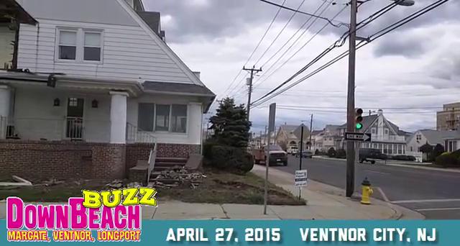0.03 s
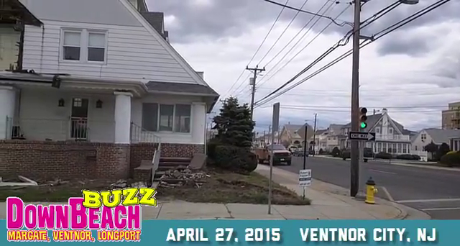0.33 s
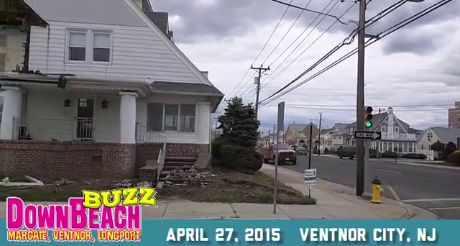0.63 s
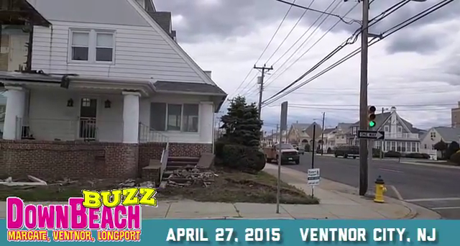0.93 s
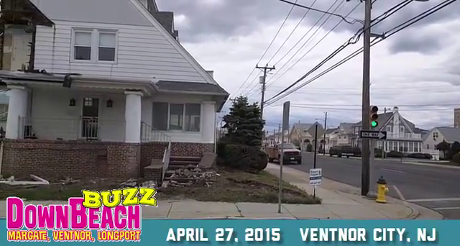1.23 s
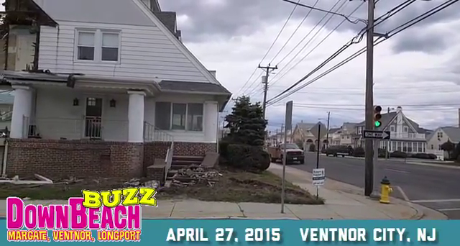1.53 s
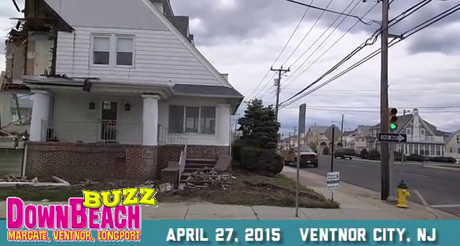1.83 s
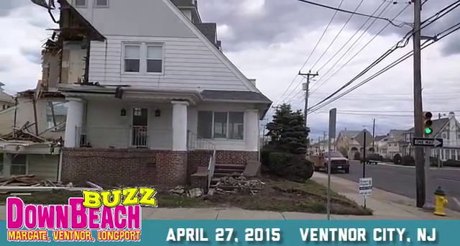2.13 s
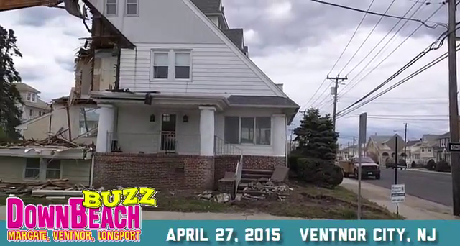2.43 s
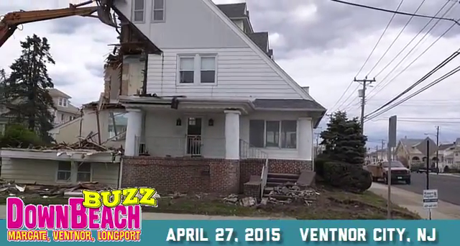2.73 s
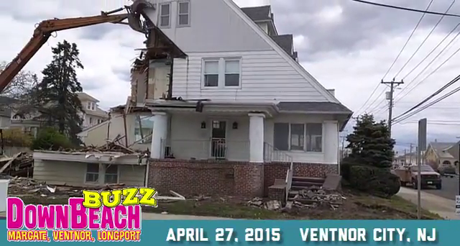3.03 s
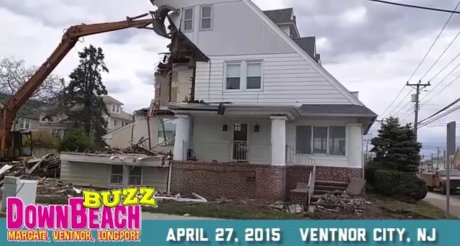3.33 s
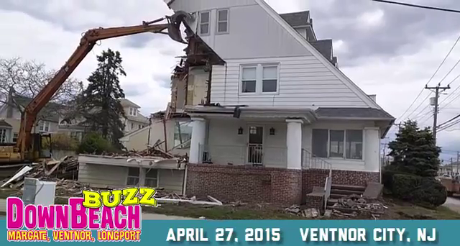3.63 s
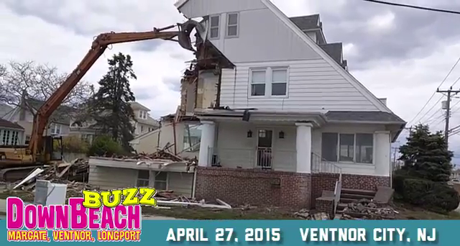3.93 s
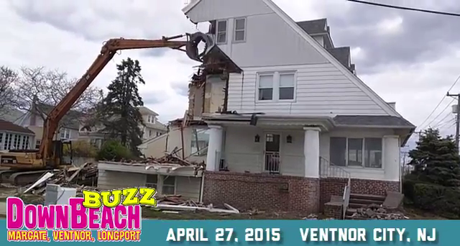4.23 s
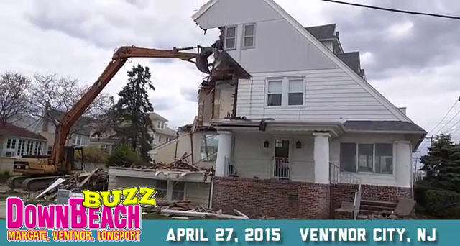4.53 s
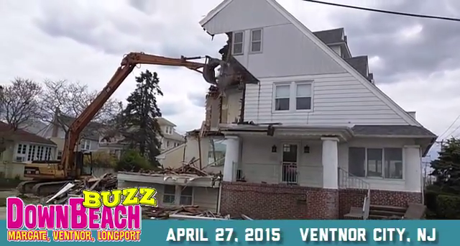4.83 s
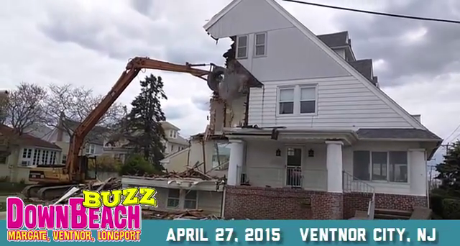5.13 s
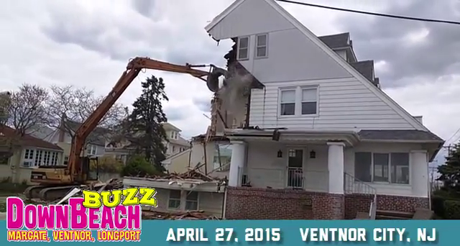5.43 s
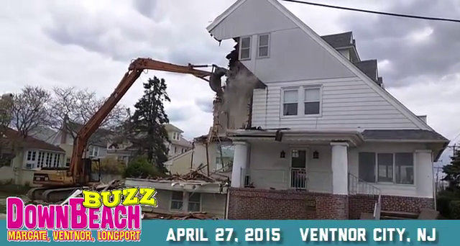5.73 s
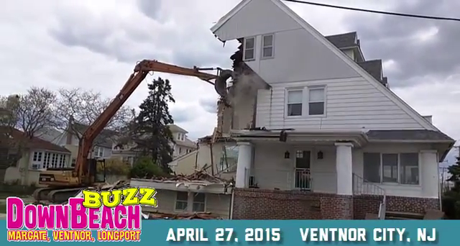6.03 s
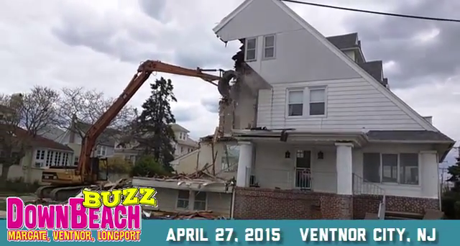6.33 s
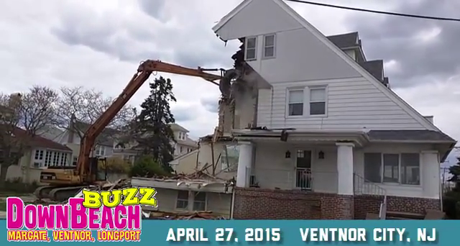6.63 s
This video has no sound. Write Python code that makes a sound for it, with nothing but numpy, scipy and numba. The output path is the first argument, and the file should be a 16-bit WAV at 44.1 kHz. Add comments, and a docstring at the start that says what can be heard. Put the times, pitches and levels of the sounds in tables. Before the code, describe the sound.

An excavator rips into a wooden house wall, beams cracking and brittle shards pouring down over a droning diesel engine.

```python
"""Tearing down a wooden house

An excavator's claw rips out a wall across the street. Beams thud and splinter, metal squeals as it
drags, and brittle siding and plaster snap and pour down in shards. The diesel speeds up and sags
under load while oil hisses and a pump whines. House fronts echo the breaking, over an idling
machine and distant traffic."""
import sys
import numpy as np
from scipy import signal
from scipy.fft import rfft, irfft, next_fast_len
from scipy.io import wavfile
from scipy.ndimage import uniform_filter1d
from numba import njit

SR = 44100
rng = np.random.default_rng(int(sys.argv[2]) if len(sys.argv) > 2 else 0)


def wav_out(sig):
    """Save sig, one row per channel (or a flat mono array), as 16-bit PCM at SR to the path in sys.argv[1]."""
    wavfile.write(sys.argv[1], SR, np.round(np.clip(np.atleast_2d(sig).T, -1, 1) * 32767).astype(np.int16))


N = 295029
T = np.arange(N) / SR

# Debris streaming from the wall. Each row: time in seconds, crushing boards in dB,
# splitting fibres in dB relative to the boards, falling shards in dB.
COLLAPSE = [(2.4, -48, -6, -55), (2.9, -37, -11, -47.5), (3.15, -24, -8.5, -35.5), (3.8, -32, -3, -35.5),
            (3.93, -23, -1.5, -25.5), (4.3, -18.5, -1, -23), (4.6, -19, -1, -17.5), (4.95, -21, 3.5, -13),
            (5.3, -19, 0, -16.5), (5.6, -23.5, 0, -23), (5.9, -25, -2.5, -27), (6.1, -22.5, 0.5, -22),
            (6.5, -25.5, 3.5, -21), (6.69, -27.5, 4.5, -27)]
# The excavator's engine. Each row: time in seconds, firings per second, firing tone level in dB.
DIESEL = [(0.0, 48.02, -27), (0.99, 48.4, -27), (1.25, 57.9, -21), (1.51, 57.15, -25.5),
          (2.78, 56.03, -22.5), (3.22, 50.1, -24), (3.6, 56.83, -20.5), (4.04, 49.1, -25.5),
          (4.25, 48.9, -24.5), (4.69, 53.44, -25.5), (4.97, 51.3, -21), (5.18, 47.5, -26),
          (5.29, 45.96, -19.5), (5.5, 45.63, -18), (5.79, 57.23, -21.5), (6.09, 54.9, -21),
          (6.52, 49.24, -24.5), (6.69, 48.8, -30)]


def timber(split_hz=2100):
    """Boards crush with a hollow body and bright splitting fibres; thin slats clack, and boards break."""
    # A board breaks. Each row: start in seconds, crack in dB, crunch in dB, crunch decay in seconds.
    breaks = [(2.689, -18.5, -46, 0.036), (2.785, -18, -38, 0.068), (2.948, -10.5, -15.5, 0.037),
              (2.999, -12, -35, 0.056), (3.19, -2.5, -27, .04), (3.221, -8, -22, .03),
              (3.284, 0.5, -16.5, 0.033), (3.303, -3.5, -23.5, 0.11), (3.578, -9, -18.5, 0.074),
              (3.642, -4, -21, 0.045), (3.825, -8, -30, 0.064), (3.9, -15, -19, 0.023),
              (3.972, -16, -13, 0.02), (4.11, -1, -16.5, 0.021), (4.206, 0, -22, .06),
              (4.446, -12, -18.5, 0.056), (4.526, -1, -34, 0.029), (4.64, -0.5, -25, 0.018),
              (4.733, -1.5, -30, .03), (4.772, 0.5, -16, 0.0098), (5.075, -1.5, -18, 0.043),
              (5.134, -3, -21, 0.068), (5.215, 3, -19, 0.022), (5.757, -6, -19, 0.071),
              (5.953, -5.5, -24.5, .05), (6.241, -3, -17, 0.066)]
    # The tone of the wood. Each row: frequency in Hz, level in dB.
    wood_tone = [(190, -13), (330, -7.5), (398, -4), (459, -5), (541, 1.5), (807, 0), (930, 0),
                 (1220, -3.5), (1580, 1.5), (1980, -2), (2330, -0.5), (3020, -2.5), (3960, -9.5),
                 (5500, -11), (7150, -22), (12100, -120)]
    splinters = pour(wood_tone, t60=0.013, spread_db=0, clump_db=2, clump_rate=60, count=12000)
    slats = pour(wood_tone, t60=0.072, spread_db=2.5, clump_db=4.5, clump_rate=34, count=900)
    crush = splinters + undb(-2) * slats + undb(2) * wash(wood_tone)
    body = unit(filtered(crush, 5, split_hz))
    fibres = unit(filtered(crush, 5, split_hz, "high"))
    cracks = fractures(breaks, wood_tone, length_s=0.02, t60=0.019, spread_db=1, count=40)
    stream = swell(COLLAPSE)
    crunch = surges([(s, db, decay) for s, _, db, decay in breaks], lag_s=0.023, rise_s=0.02)
    crushing = np.hypot(stream, crunch)  # hypot adds two levels by their power
    splitting = np.hypot(stream, undb(-3) * crunch) * undb(curve(COLLAPSE, column=2))
    return undb(-0.8) * body * crushing + undb(-0.5) * fibres * splitting + undb(-9) * cracks


def shards():
    """Brittle pieces snap off and rain down: sliding plaster dust, dry grit and larger bits that clink."""
    # Siding or plaster snaps and spills shards.
    # Each row: start in seconds, snap in dB, spill in dB, spill decay in seconds.
    snaps = [(2.4495, -31, -45, 0.027), (2.585, -36, -44, .05), (2.6868, -27, -46, .03),
             (2.786, -24, -37, 0.017), (2.863, -27, -52, 0.029), (2.946, -25, -37, 0.045),
             (2.991, -23, -38, .03), (3.097, -26, -24.5, .03), (3.191, -11.5, -22, .04),
             (3.281, -3, -19, .02), (3.302, -10.5, -21, 0.037), (3.322, -9, -26, .02),
             (3.355, -6, -27, .02), (3.397, -8, -29.5, 0.025), (3.497, -15, -26, 0.017),
             (3.6328, -17, -26, 0.053), (3.823, -14, -31, 0.035), (3.887, -13, -28, .05),
             (3.923, -5, -17, 0.065), (4.0894, -16, -13.5, 0.061), (4.127, -4, -11, 0.078),
             (4.2067, -5, -17.5, 0.057), (4.29, -7, -23, .03), (4.385, 0, -32, .02),
             (4.399, -11, -32, 0.017), (4.425, -5, -33, 0.028), (4.504, -14, -12, 0.1),
             (4.623, 0, -34, .03), (4.654, 0, -17, .03), (4.7224, 0, -28, 0.025), (4.7494, 0, -28, 0.036),
             (4.7977, 3, -25, .03), (5.19, -3.5, -20, 0.041), (5.38, -10, -12.5, 0.063),
             (5.757, -11, -22, 0.049), (6.075, -20, -22, 0.049), (6.253, -8, -20, 0.036),
             (6.414, -14, -29, 0.043), (6.53, -18, -25, 0.038)]
    # The tone of the shards. Each row: frequency in Hz, level in dB.
    shard_tone = [(2200, -25), (3500, -15), (4000, -11), (5300, -8.5), (6200, -8.5), (7100, -6.5),
                  (7950, -3.5), (8600, -4.5), (9600, -4.5), (10400, -8.5), (11200, -8.5), (13000, -13.5),
                  (15700, -15.5)]
    grit = pour(shard_tone, t60=0.0061, spread_db=-2, clump_db=1, clump_rate=31, count=16000)
    clinks = pour(shard_tone, t60=0.04, spread_db=2.5, clump_db=1, clump_rate=35, count=3000)
    cracks = fractures(snaps, shard_tone, length_s=0.01, t60=0.0049, spread_db=2, count=30)
    dust = wash(shard_tone)
    spills = surges([(s, db, decay) for s, _, db, decay in snaps], lag_s=0.0078, rise_s=0.009)
    falling = np.hypot(swell(COLLAPSE, column=3), spills)
    return (undb(-7) * grit + undb(-7.5) * clinks + undb(-8) * dust) * falling + undb(-3.5) * cracks


def house_frame(give_s=0.0067, tumble_decay_s=0.089):
    """The frame booms as the claw leans into it, while heavy rubble tumbles inside."""
    # Blows to the frame. Each row: start in seconds, boom in dB, pitch in Hz, loosened rubble in dB.
    thuds = [(2.79, -30, 200, -28.5), (2.938, -3.5, 206, -26), (3.189, -8, 167, -27),
             (3.219, -1.5, 214, -17), (3.298, -15, 190, -27), (3.729, -18, 201, -28),
             (3.89, -27, 200, -24.5), (4.296, 0.5, 223, -26), (4.31, -3, 192, -32),
             (4.355, -11, 244, -18.5), (5.19, -18, 200, -24), (5.445, -12, 200, -39),
             (5.651, -30, 200, -28)]
    # The frame's ringing tones. Each row: multiple of the pitch, level in dB, seconds to fade by 60 dB.
    modes = [(.76, 2.5, 0.035), (1, 0, 0.074), (1.27, -29.5, .09), (1.85, -2, 0.025)]
    # The tone of the rubble. Each row: frequency in Hz, level in dB.
    rubble_tone = [(70, -19.5), (130, -8), (200, 1.5), (270, 1), (350, -7.5), (500, -11.5), (900, -43.5)]
    booms = np.zeros(N)
    for start, db, pitch, _ in thuds:
        age = np.maximum(T - start, 0)
        push = undb(db) * (1 - np.exp(-age / give_s))  # the wood gives way gradually
        for multiple, mode_db, t60 in modes:
            booms += push * undb(mode_db - 60 * age / t60) * np.sin(2 * np.pi * pitch * multiple * age)
    tumble = pour(rubble_tone, t60=0.044, spread_db=2, clump_db=5.5, clump_rate=16, count=1500)
    shaken = surges([(s, db, tumble_decay_s) for s, _, _, db in thuds], lag_s=0.013, rise_s=0.011)
    return undb(0.4) * booms + tumble * np.hypot(undb(-8.5) * swell(COLLAPSE), shaken)


def squeals(rough_db=3):
    """Metal and siding stick and slip past each other: short, rough tones that flare up and fade."""
    # Each row: start in seconds, pitch in Hz, level in dB, length in seconds, wobble as a share of pitch.
    drags = [(1.227, 3600, -43, 0.07, 0.11), (3.668, 4964, -33, 0.048, .025),
             (4.148, 5770, -21, 0.042, 0.021), (4.206, 1590, -14.5, 0.073, 0.02),
             (4.223, 1492, -15, 0.088, 0.0103), (4.273, 2620, -21.5, 0.045, 0.012),
             (4.295, 4280, -12, 0.007, 0.063), (4.31, 2220, -23, .06, 0.0148),
             (4.317, 1596, -18, 0.097, 0.031), (4.4, 3630, -22, 0.027, 0.0253),
             (4.425, 2500, -18, 0.057, 0.0227), (4.486, 3430, -20, 0.049, 0.022),
             (4.518, 4280, -20, 0.043, .025), (5.439, 7940, -27, 0.058, 0.017),
             (6.409, 4940, -24, 0.03, 0.021)]
    waver = np.cumsum(wander(700)) / SR
    out = np.zeros(N)
    for start, hz, db, length, wobble in drags:
        progress = np.maximum(T - start, 0) / length * np.pi
        flare = progress * np.exp(1 - progress)
        out += undb(db) * flare * np.sin(2 * np.pi * hz * (T + wobble * waver))
    return out * undb(rough_db * wander(140))


def diesel(roughness=0.064, lope_radians=0.093, waver_db=2.1):
    """The exhaust drones at multiples of the firing rate, each tone slightly unsteady."""
    # How loud the exhaust pipe makes the second and third tones. Each row: frequency in Hz, level in dB.
    pipe = [(90, -40), (102, -35.5), (114, -31), (128, -28), (137, -34.5), (143, -30), (152, -33.5),
            (162, -36), (167, -39.5), (174, -37)]
    # The other tones. Each row: multiple of the firing rate, dB relative to the mean of first and third.
    overtones = [(2.5, -11), (4, -20.5), (5, -16), (6, -26), (7, -29.5), (8, -36)]
    rate = curve(DIESEL)
    phase = phase_of(rate)
    first = undb(curve(DIESEL, column=2))
    pipe_hz, pipe_db = np.transpose(pipe)
    second = undb(np.interp(2 * rate, pipe_hz, pipe_db))
    third = undb(np.interp(3 * rate, pipe_hz, pipe_db))
    out = undb(-1) * first * np.cos(phase) * (1 + 0.12 * wander(16))
    out += second * undb(waver_db * wander(7.4)) * np.sin(2 * phase + lope_radians * wander(6.6))
    out += third * undb(waver_db * wander(5)) * np.cos(3 * phase + lope_radians * wander(21))
    for multiple, db in overtones:
        level = np.sqrt(first * third) * undb(db) * (1 + roughness * wander(22))
        # uneven firings smear the high tones most
        out += level * np.cos(multiple * (phase + lope_radians * wander(36)))
    return np.sqrt(2) * out


def pump():
    """A rough pump or fan whine near 1 kHz swells, then holds nearly steady."""
    # Each row: time in seconds, level in dB.
    levels = [(0, -59), (1.6, -49), (2.1, -41.5), (6.69, -44)]
    return noise_band(hz=960, half_width_hz=130) * undb(curve(levels))


def valves():
    """Oil forced through valves: a faint hiss whose pitch follows the flow, and a fluttering one above."""
    # The lower hiss. Each row: time in seconds, pitch in Hz, level in dB.
    flow = [(0, 5720, -51), (.3, 5720, -58), (.7, 5700, -55), (1.1, 5730, -62), (1.5, 4750, -59),
            (2.0, 4743, -56), (2.4, 5007, -57), (2.9, 5075, -54)]
    lower = noise_band(hz=curve(flow), half_width_hz=230) * undb(curve(flow, column=2))
    upper = noise_band(hz=6850, half_width_hz=230) * undb(-60 + 2.1 * wander(11.1))
    return lower + upper


def street():
    """An idling engine, low traffic rumble and the gently wavering rush of fans and tyres."""
    # The idling engine's hum and whine, the rumble and the rush. Each row: frequency in Hz, level in dB.
    idle_tones = [(57.8, -59), (115.0, -42), (284, -56.5), (798, -54), (1087, -57.5), (1283, -53),
                  (1391, -51)]
    rumble_tone = [(15, -14), (32, 1), (65, 8), (90, -7.5), (135, -4), (200, -8.5), (300, -17), (500, -32)]
    rush_tone = [(200, -17), (300, -16), (420, -6), (640, -4.5), (830, -3), (1100, -2.5), (1400, -2),
                 (2100, -5), (2900, -15.5), (4000, -22), (5200, -19), (6800, -23), (8100, -29),
                 (10400, -28), (15700, -38.5)]
    idler = np.zeros(N)
    for hz, db in idle_tones:
        level = np.sqrt(2) * undb(db) * (1 + 0.041 * wander(8.8))
        idler += level * np.sin(2 * np.pi * hz * T + 0.5 * wander(3.42))
    rumble = wash(rumble_tone) * undb(-30.5 + wander(4.66))
    rush = sum(wash(rush_tone) * undb(0.5 * wander(rate)) for rate in (3, 14))
    clatter = 1 + 0.11 * np.sin(phase_of(curve(DIESEL)))  # swells each time the excavator fires
    return idler + rumble + unit(rush * clatter) * undb(-36.5)


def house_fronts(x, t60=0.43, echo_db=-12, dull_hz=4000):
    """Add scattered, duller echoes from the buildings around."""
    t = T[:SR]
    bounces = rng.standard_normal(SR) * (rng.random(SR) < 0.03)
    tail = bounces * undb(-60 * t / t60) * (t > 0.015)
    tail = filtered(tail / np.sqrt(np.sum(tail ** 2)), 1, dull_hz)
    return x + undb(echo_db) * signal.fftconvolve(x, tail)[:N]


def pour(tone, t60, spread_db, clump_db, clump_rate, count):
    """A stream of ringing fragments of mixed sizes, arriving in clumps; its average level stays near 1."""
    chance = rng.random((count, 2))
    start = chance[:, 0] * T[-1]
    size_db = -spread_db * np.log(np.maximum(chance[:, 1], 0.01))
    size_db += clump_db * np.interp(start, T, wander(clump_rate))
    stream = colour(fragments(start, undb(size_db), tone, t60), tone)
    return stream / np.sqrt(uniform_filter1d(stream ** 2, SR // 8) + 1e-12)


def fractures(table, tone, length_s, t60, spread_db, count):
    """Each crack is a run of tiny breaks that quickly gathers, then thins out."""
    out = np.zeros(N)
    for start, db, *_ in table:
        wait, size, early = rng.exponential(size=(3, count))
        times = start + length_s * (wait - 0.15 * early)
        gains = undb(spread_db * np.minimum(size, 3)) * np.exp(-wait / 2)
        crack = fragments(times, gains, tone, t60)
        out += crack * undb(db) * np.sqrt(length_s * SR / (np.sum(crack ** 2) + 1e-12))
    return colour(out, tone)


def fragments(start, size, tone, t60, modes=3):
    """Each fragment rings at a few random pitches in the tone's range, fading in roughly t60 seconds."""
    low_hz, high_hz = tone[0][0], tone[-1][0]
    chance = rng.random((len(start), modes, 3))
    hz = low_hz + (high_hz - low_hz) * chance[..., 0]
    decay = t60 * 4 ** (2 * chance[..., 1] - 1)
    gain = size[:, None] * np.sign(chance[..., 2] - 0.5) * (t60 / decay) ** 0.5
    return ring(np.repeat(start, modes), hz.ravel(), decay.ravel(), gain.ravel())


@njit
def ring(start, hz, t60, size):
    """Add up pure tones, each struck at its own time and fading by 60 dB in t60 seconds."""
    out = np.zeros(N)
    for k in range(len(start)):
        step = np.exp((2j * np.pi * hz[k] - np.log(1000.) / t60[k]) / SR)
        swing = size[k] + 0j
        first = max(int(start[k] * SR), 0)
        for i in range(first, min(first + int(t60[k] * SR), N)):
            out[i] += swing.imag
            swing *= step
    return out


def surges(rows, lag_s, rise_s):
    """The level of bursts of debris: each peaks lag_s after its start, then dies away."""
    power = np.zeros(N)
    for start, db, decay in rows:
        age = T - start - lag_s
        fade = np.maximum(-age / rise_s, age / decay)
        power += undb(db) ** 2 * np.exp(-2 * np.minimum(fade, 20))
    return np.sqrt(power)


def wash(tone):
    """Countless tiny sounds merged into a smooth rush of the given tone."""
    return unit(colour(rng.standard_normal(N), tone))


def noise_band(hz, half_width_hz):
    """A narrow band of noise around one pitch."""
    flutter = filtered(rng.standard_normal(N), 2, half_width_hz)
    return unit(flutter * np.sin(phase_of(hz)))


def colour(x, tone):
    """Shape a sound by rows of Hz and dB, falling away beyond the first and last row."""
    hz, db = np.transpose(sorted(tone))
    size = 2 * next_fast_len(N // 2 + 8192)
    octave = np.log2(np.maximum(np.arange(size // 2 + 1) * SR / size, 1))
    outside = np.maximum(np.log2(hz[0]) - octave, 0) + np.maximum(octave - np.log2(hz[-1]), 0)
    gain = undb(np.interp(octave, np.log2(hz), db) - 24 * np.minimum(outside, 2))
    # fold the filter forward in time so nothing rings before it is struck
    cepstrum = irfft(np.log(gain))
    cepstrum[1:size // 2] *= 2
    cepstrum[size // 2 + 1:] = 0
    return irfft(rfft(x, size) * np.exp(rfft(cepstrum)))[:N]


def filtered(x, order, hz, kind="low"):
    """Keep what lies below hz, or above it for "high"."""
    return signal.sosfilt(signal.butter(order, hz, kind, fs=SR, output="sos"), x)


def wander(rate):
    """Random drift of size about 1, turning rate times a second."""
    points = rng.standard_normal(4096)
    return 1.26 * np.interp(T * rate, np.arange(len(points)), points)


def curve(table, column=1):
    """One column of a table, joined by straight lines in time."""
    rows = np.array(table)
    return np.interp(T, rows[:, 0], rows[:, column])


def swell(table, column=1):
    """Gain from a dB column; silent until the table begins."""
    return undb(curve(table, column)) * np.clip((T - table[0][0]) / 0.06, 0, 1)


def phase_of(hz):
    """The running angle of a steady or gliding tone."""
    return 2 * np.pi * np.cumsum(hz * np.ones(N)) / SR


def undb(db):
    """Decibels to gain."""
    return 10 ** (np.asarray(db) / 20)


def unit(x):
    """Scale to an average (rms) level of 1."""
    return x / np.sqrt(np.mean(x ** 2) + 1e-18)


def scene():
    """The demolition and its echoes over the machines and the street, in mono."""
    demolition = timber() + shards() + house_frame() + squeals()
    return (house_fronts(demolition) + diesel() + valves() + street() + pump())[None]


def record(dry, ceiling=0.92, top_hz=15800):
    """Round off the loudest peaks and cut the highest treble."""
    rounded = dry / (1 + (dry / ceiling) ** 4) ** 0.25
    return signal.sosfilt(signal.ellip(10, 0.2, 80, top_hz, fs=SR, output="sos"), rounded)


dry = scene()
out = record(dry)
wav_out(out)
```